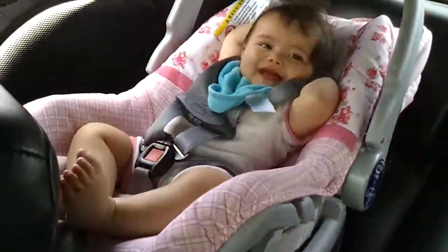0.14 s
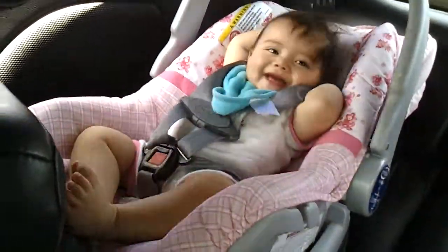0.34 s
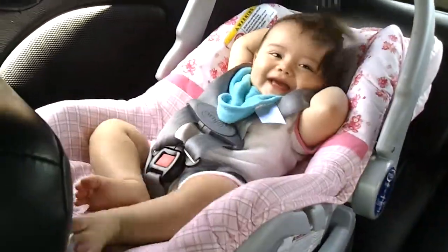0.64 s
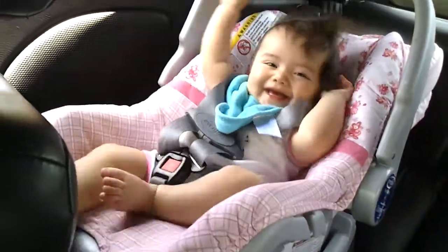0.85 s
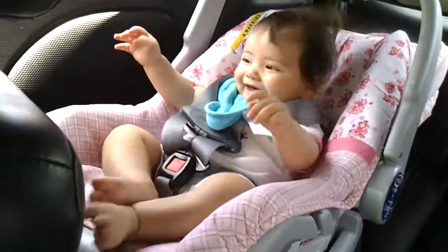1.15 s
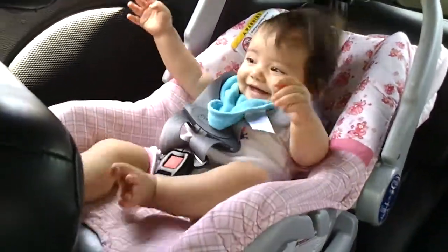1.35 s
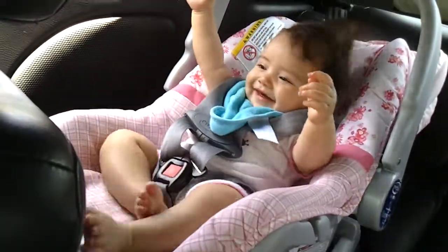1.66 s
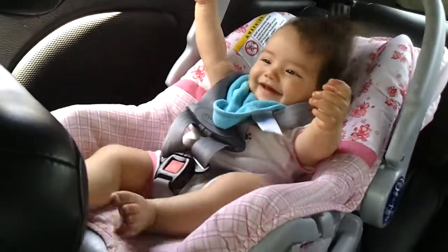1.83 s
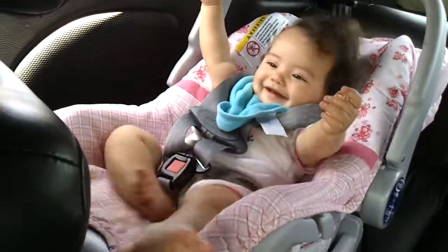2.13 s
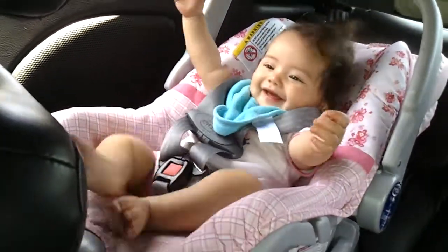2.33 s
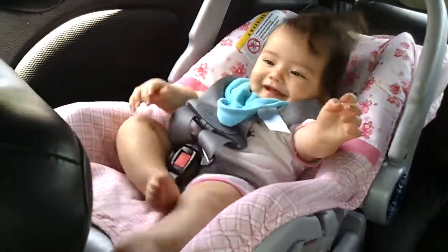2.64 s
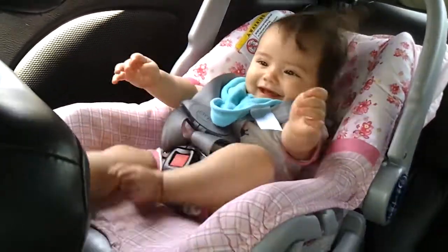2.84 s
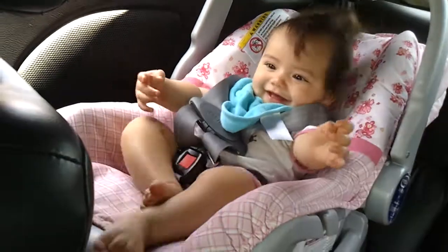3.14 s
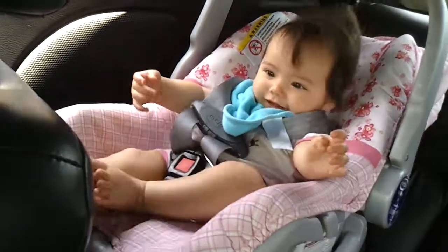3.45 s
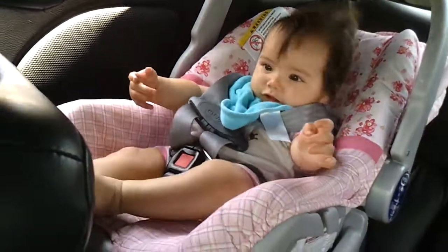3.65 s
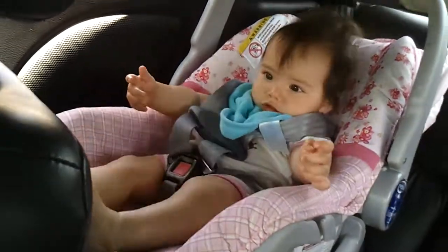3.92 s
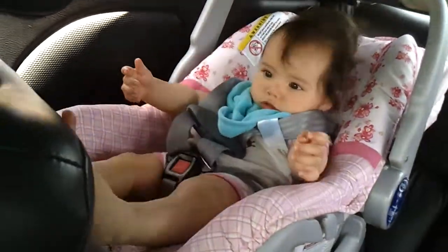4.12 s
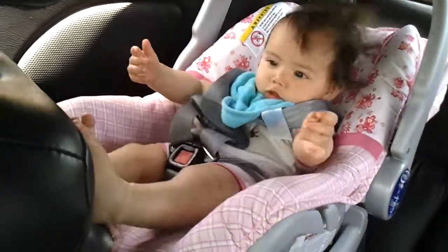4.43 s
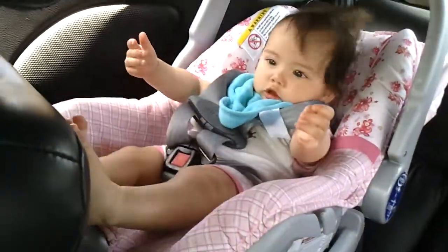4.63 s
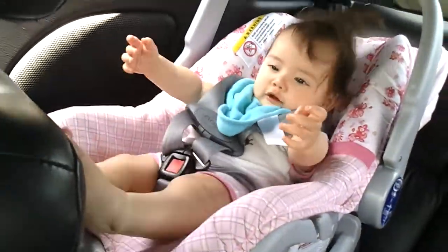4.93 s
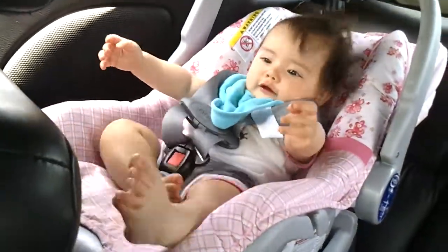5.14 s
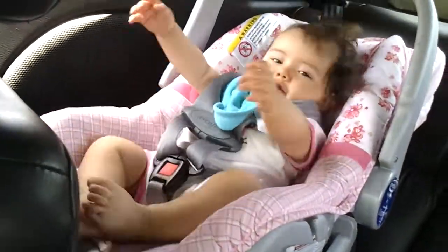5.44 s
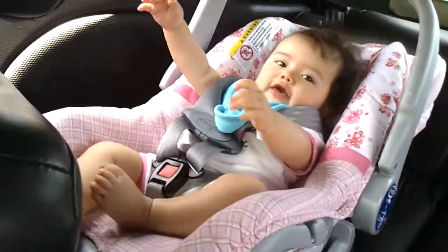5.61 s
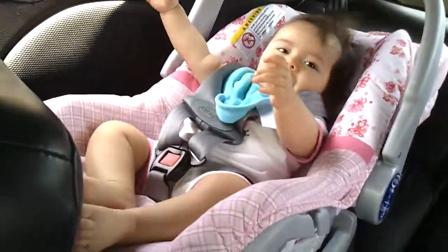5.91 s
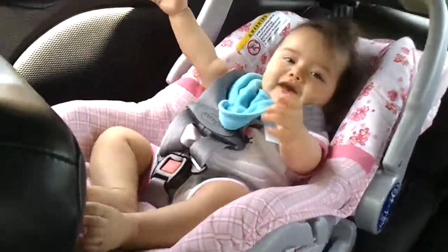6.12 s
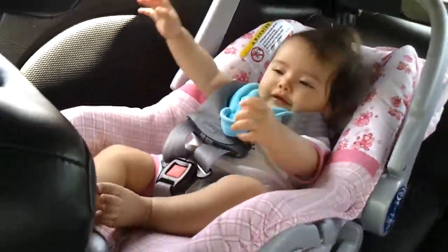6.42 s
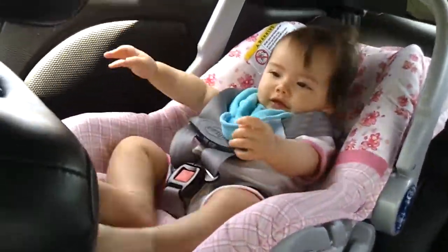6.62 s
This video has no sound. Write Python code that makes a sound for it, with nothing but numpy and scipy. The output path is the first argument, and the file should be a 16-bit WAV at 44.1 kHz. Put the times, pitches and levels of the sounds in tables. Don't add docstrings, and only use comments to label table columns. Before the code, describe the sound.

A small microphone in a moving car catches wind from open windows over continuous low tyre roar and soft electronic hiss. From 0 to 1.9 s the wind is uneven, with isolated hard knocks near 0.1, 0.4 and 0.9 s and smaller bumps after 1 s; cloth rustles in grainy flutters, with a crisp snap at 1.2 and a softer one at 1.4. From about 2.0 to 2.9 s buffets crowd together, clipped and crackling, each flat overload leaving a tiny muted gap. A knock falls at 3.3 s, then a calmer stretch of road noise and fading rustle lasts until 4.7, with light bumps around 4.3 and 4.5. Buffeting resumes at 4.7, grows fierce from 5.2, and becomes densest between 6.0 and 6.5 s: irregular thuds, rattling knocks, distorted splashes, a sharp crack near 6.4. It then subsides into roar and rustle by 6.8 s.

```python
import sys
import numpy as np
from scipy import signal
from scipy.fft import rfft, irfft, next_fast_len
from scipy.io import wavfile

SR = 44100
rng = np.random.default_rng(int(sys.argv[2]) if len(sys.argv) > 2 else 0)


def undo_db(level):
    steps = np.asarray(level, float) / 20
    return 10 ** steps


def master(y):
    cut = np.clip(np.atleast_2d(y).T, -1, 1)
    pcm = np.round(cut * 32767)
    wavfile.write(sys.argv[1], SR, pcm.astype(np.int16))


N = 298557
RAIL = 0.48

# start [t/s], length [t/s]
STALLS = [(0.8114, 0.0042), (1.5098, 0.004), (1.5163, 0.005), (2.0311, 0.0072), (2.0695, 0.0057),
          (2.1389, 0.0075), (2.1608, 0.005), (2.2215, 0.0052), (2.2918, 0.0047), (2.3766, 0.0045),
          (2.3931, 0.0042), (2.6844, 0.0047), (2.7832, 0.004), (2.8864, 0.0045), (4.7544, 0.0045),
          (4.7607, 0.006), (4.7968, 0.0052), (4.8106, 0.0057), (4.935, 0.005), (5.2346, 0.0045),
          (5.4219, 0.0047), (5.849, 0.0072), (6.0328, 0.0045), (6.0857, 0.005), (6.2999, 0.0057),
          (6.3286, 0.0075), (6.3746, 0.006), (6.5656, 0.0045)]
# start [t/s], length [t/s], extra strength [level/dB], whip steepness [level/dB]
BUFFETS = [(0.0724, 0.0088, 4.5, -13.5), (0.417, 0.0055, 2.5, -14.5), (0.9194, 0.0084, 3.5, -15),
           (2.0328, 0.039, 0.5, -17.5), (2.1344, 0.0019, 5, -9.5), (2.229, 0.014, -1, -13.5),
           (2.273, 0.019, 4, -14.5), (2.3979, .025, 0, -16), (2.434, 0.03, 5, -11.5),
           (2.6613, 0.0062, 4.5, -13.5), (2.769, 0.029, 11.5, -19.5), (3.3006, .014, 4, -12.5),
           (4.7185, .006, 3.5, -11.5), (4.8184, 0.036, 7.5, -10.5), (5.1508, 0.02, 10.5, -11),
           (5.2143, 0.055, 7.5, -8.5), (5.4275, 0.099, 8, -7), (5.562, 0.006, 17.5, -9),
           (5.65, .066, 1, -9.5), (5.7524, 0.05, 7, -10.5), (5.9993, 0.015, 5, -9.5),
           (6.0414, 0.013, 8, -6.5), (6.0949, 0.032, 3.5, -9), (6.1483, 0.087, 8, -9),
           (6.2885, 0.038, 1.5, -12), (6.3567, 0.032, 4.5, -9.5), (6.417, 0.034, 3, -8),
           (6.463, 0.043, 2, -10.5)]


def evened(x):
    return x / np.sqrt(np.mean(x ** 2) + 1e-20)


def along(rows):
    s, value = np.transpose(rows)
    return np.interp(np.arange(N) / SR, s, value)


def bumps(rows):
    return sum(along([(s - half, 0), (s, db), (s + half, 0)]) for s, half, db in rows)


def add(mix, s, sound):
    part = mix[max(round(s * SR), 0):][:len(sound)]
    part += sound[:len(part)]


def noise(spectrum):
    f, db = np.transpose(spectrum)
    size = next_fast_len(N)
    hz = np.fft.rfftfreq(size, 1 / SR)
    colour = undo_db(np.interp(np.log(hz + 1), np.log(f), db))
    white = rng.standard_normal(size)
    return evened(irfft(rfft(white) * colour, size)[:N])


def flicker(hz):
    return noise([(hz / 10, 0), (hz, 0), (hz * 2, -40)])


def road():
    # [f/Hz], density [level/dB]
    roar = [(20, -4), (60, 0.5), (110, 0.5), (250, -6), (310, -21), (560, -18), (750, -25), (1200, -22),
            (1400, -29.5), (2000, -32), (2500, -40), (4000, -50.5), (9000, -57.5)]
    level_db = -14.5 + 0.43 * flicker(8.5) + 0.61 * flicker(79)
    return undo_db(level_db) * noise(roar)


def fabric():
    # [t/s], rustle [level/dB]
    rustle = [(0.0, -48), (0.8, -49), (1.0, -43.5), (1.4, -41), (1.55, -48), (2.0, -41.5), (2.5, -42.5),
              (2.9, -40.5), (3.5, -42.5), (3.75, -49.5), (5.1, -46.5), (5.6, -44.5), (6.4, -47),
              (6.77, -40.5)]
    # peak [t/s], half length [t/s], change [level/dB]
    flaps = [(0.2, .1, 1), (0.92, 0.093, 5), (1.05, .03, 7), (1.17, 0.055, 3.5), (1.3, 0.024, 8),
             (1.33, 0.035, -5), (1.39, .04, 6), (1.81, 0.13, 4), (2.01, 0.054, 4.5), (2.07, .03, -2),
             (2.17, .05, -1), (2.36, 0.15, 3.5), (2.41, 0.026, -5), (2.75, .06, 7), (2.85, 0.023, 8),
             (2.91, .03, 8), (2.98, .03, 6), (3.28, 0.075, 2.5), (3.36, 0.024, 4), (3.43, 0.046, 7.5),
             (3.53, 0.018, 5), (3.64, 0.052, 5.5), (4.43, .06, 4), (5.2, 0.046, 7), (5.32, 0.05, 4),
             (5.38, 0.036, 2), (5.52, 0.053, -4), (5.62, .05, 5)]
    # [f/Hz], density [level/dB]
    cloth = [(1500, -23), (3000, -0.5), (5000, -0.5), (7000, 7), (8200, 4), (10000, -2.5)]
    # start [t/s], peak [level/dB], ring [t/s]
    snaps = [
        (1.2193, -29.5, 0.014),
        (1.296, -46, 0.027),
        (1.3814, -36, 0.03),
        (2.593, -40.5, 0.025),
    ]
    level_db = along(rustle) + bumps(flaps) + 3.0
    grain_db = 1.2 * flicker(30) + 0.5 * flicker(200)
    out = undo_db(level_db + grain_db) * noise(cloth)
    crack = noise(cloth[1:])
    t = np.arange(3000) / SR
    for s, db, ring in snaps:
        decay = undo_db(db + 7.0 - 60 * t / ring)
        add(out, s, decay * crack[round(s * SR):][:3000])
    return out


def draught():
    # [t/s], eddy strength [level/dB]
    gusts = [(0.0, -21), (0.5, -21), (0.95, -20.5), (1.2, -26.5), (1.47, -19), (1.95, -25), (2.25, -22),
             (2.6, -19), (2.9, -25), (3.3, -22), (3.5, -25), (4.4, -24), (4.75, -20.5), (5.1, -23.5),
             (5.7, -18.5), (5.95, -17.5), (6.2, -14.5), (6.77, -23)]
    # peak [t/s], half length [t/s], change [level/dB]
    surges = [(0.11, 0.026, -7), (0.17, 0.033, 5.5), (0.52, .05, 3.5), (0.63, 0.035, 3.5),
              (1.05, 0.015, 11), (1.09, 0.028, -15), (1.15, 0.017, 7.5), (1.47, 0.026, 2.5),
              (2.09, .03, 1.5), (2.32, 0.057, -4), (3.0, 0.027, 7), (3.17, 0.072, 3.5), (3.22, 0.037, -12),
              (4.27, 0.014, 6), (4.5, 0.052, 1.5), (5.2, 0.014, -8), (5.35, .02, 3.5), (5.38, 0.039, -2),
              (5.6, 0.037, -5), (5.98, 0.048, -10), (6.26, 0.017, -15), (6.55, 0.031, 5.5)]
    rise_s, fall_s = 0.015, 0.04
    plateaus = [along([(s - rise_s, 0), (s, db), (s + length, db), (s + length + fall_s, 0)])
                for s, length, db, _ in BUFFETS]
    return along(gusts) + bumps(surges) + np.max(plateaus, axis=0)


def eddies():
    # [f/Hz], density [level/dB]
    heave_colour = [(15, 0.5), (50, 1.5), (120, 5), (250, -8.5), (500, -29), (1000, -73)]
    # [f/Hz], density [level/dB]
    swirl_colour = [(60, -20), (150, 2), (300, 0), (500, -5), (900, -18), (1800, -35), (4000, -81.5)]
    heave_top_db, swirl_top_db = 7, 3.5
    strength_db = draught() + 20
    lumps_db = 3 * flicker(40)
    heave_db = -12.5 + 1.5 * np.minimum(strength_db, heave_top_db) + 0.4 * lumps_db
    swirl_db = -19 + 1.82 * np.minimum(strength_db, swirl_top_db) + 1.05 * lumps_db
    return undo_db(heave_db) * noise(heave_colour) + undo_db(swirl_db) * noise(swirl_colour)


def slams():
    # flip [t/s], peak [level/dB], swirl [f/Hz]
    bursts = [(0.078, -13.5, 285), (0.415, -4, 440), (0.451, -2, 314), (0.919, 4, 413), (1.059, -9, 450),
              (1.147, -9, 276), (1.946, -3.5, 211), (2.109, -7, 253), (2.146, 8, 186), (2.239, -2, 363),
              (2.27, -9, 277), (2.394, -9, 363), (2.797, 7, 204), (2.988, -8, 382), (3.289, -5.5, 209),
              (4.271, 0.5, 204), (4.509, -7.5, 336), (4.723, 2, 824), (4.817, 2, 282), (5.217, 7, 495),
              (5.426, -32, 387), (5.554, -2, 320), (5.642, -12, 270), (5.797, -1, 650), (6.036, -7, 280),
              (6.187, 5, 319), (6.276, 0.5, 217), (6.36, -4, 453), (6.42, 3.5, 810), (6.465, -8, 329)]
    out = np.zeros(N)
    t = np.arange(-300, 1500) / SR
    shape = np.exp(-abs(t) / np.where(t < 0, 0.0015, 0.0022))
    chance = rng.random((len(bursts), 2))
    for (s, db, hz), (side, sag) in zip(bursts, chance):
        swing = np.sin(2 * np.pi * hz * t * (1 - 8 * sag * t))
        add(out, s + 0.0008 + t[0], undo_db(db + 6.0) * np.sign(side - 0.5) * shape * swing)
    return out


def stalls(air):
    out = air.copy()
    brief_count = 42
    when, long = rng.random((brief_count, 2)).T
    brief_start = 0.1 + when * (N / SR - 0.2)
    brief_length = np.interp(long, (0, 1), (0.0027, 0.0037))
    for s, length in STALLS + list(zip(brief_start, brief_length)):
        t = np.arange(-0.002, length + 0.0005, 1 / SR)
        swell, release = (t + 0.002) / 0.0035, (length + 0.0005 - t) / 0.002
        ramp = np.clip(np.minimum(swell, release), 0, 1)
        grip = np.sin(np.pi / 2 * ramp) ** 2
        here = out[round((s + t[0]) * SR):][:len(t)]
        add(out, s + t[0], grip * (1.3 * RAIL * np.sign(here[40]) - here))
    return out


def whip_train():
    # [t/s], steepness [level/dB]
    whips = [(0.0765, -8.3), (0.4171, -7.7), (0.9194, -6.5), (2.1497, 1.8), (2.1508, -4.9), (2.2748, -6.4),
             (2.2906, -5.6), (2.4051, -7.5), (2.4468, -5.9), (2.7818, -2.7), (2.7977, -5.6), (4.7223, -6.3),
             (4.7233, -8), (4.7598, -9), (5.2207, -4.2), (5.2218, -3.9), (5.437, -3.8), (5.4757, -4.0),
             (5.5599, -5.0), (5.6614, -3.5), (5.7943, -3.3), (5.8118, -4.5), (6.0472, -4.2), (6.0483, -2.9),
             (6.199, -4.8), (6.3134, -3.2), (6.3942, -7), (6.4237, 1.3), (6.4248, -0.4), (6.4693, -2.4)]
    wind_up_s, wind_up_db = 0.0009, -9
    gap_s, gap_growth, spread_db = 0.0012, 0.045, 2.5
    steepest = np.transpose(whips)[0]
    lone = steepest[np.diff(steepest, prepend=0) > 2 * wind_up_s]
    rows = whips + [(s - wind_up_s, wind_up_db) for s in lone]
    busy = STALLS + [(s - 2 * wind_up_s, 3 * wind_up_s) for s in steepest]
    chance = rng.random((len(BUFFETS), 2, 24))
    for (s, length, _, steep_db), (wait, size) in zip(BUFFETS, chance):
        gaps = 0.0008 - (gap_s / 2 + gap_growth * length) * np.log(wait)
        after = np.cumsum(gaps) - gaps[0]
        for a, z in zip(after, size):
            taken = any(0 < s + a - start < span for start, span in busy)
            if a < length and not taken:
                rows.append((s + a, steep_db + spread_db * (2 * z - 1)))
    return sorted(rows)


def flips(air):
    out = air.copy()
    t = np.arange(-200, 201) / SR
    hold_s = 0.0028
    for s, db in whip_train():
        slope = undo_db(db + 2.5) * SR / 6
        lead = RAIL / slope + 0.0003
        grip = np.exp(-(t / np.where(t < 0, lead, lead + hold_s)) ** 4)
        here = out[round((s + t[0]) * SR):][:len(t)]
        side = -np.sign(here[200 - round(lead * SR)])
        whip = side * np.clip(slope * t, -1.2 * RAIL, 1.2 * RAIL)
        add(out, s + t[0], grip * (whip - here))
    return out


def scene():
    air = stalls(road() + eddies() + slams())
    return (flips(air) + fabric())[None]


def roll_off(x):
    return signal.sosfilt(signal.butter(12, 16000, fs=SR, output="sos"), x)


def record(dry):
    cut_hz, cut_q = 210, 0.6
    bass_leak = 0.27
    knee, ceiling = 0.55, 0.712
    railed = np.clip(dry, -RAIL, RAIL)
    railed = railed + undo_db(-54) * noise([(500, -18), (3000, 10.0), (9000, -4.5)])
    add(railed[0], 6.3954 - 4 / SR, undo_db(6.0) * np.hanning(9))
    w = 2 * np.pi * cut_hz
    b, a = signal.bilinear([1, bass_leak * w, 0], [1, w / cut_q, w * w], SR)
    cut = signal.lfilter(b, a, railed)
    over = np.maximum(abs(cut) - knee, 0) / (1.1 * ceiling - knee)
    rounded = np.minimum(abs(cut), knee) + (1.07 * ceiling - knee) * np.tanh(over)
    knocks = np.sign(cut) * rounded
    edge = signal.firwin(101, 8160, window=("kaiser", 9), fs=SR)
    limited = signal.oaconvolve(knocks, edge[None], "same")
    out = np.clip(limited, -ceiling, ceiling)
    return roll_off(out)


dry = scene()
out = record(dry)
master(out)
```